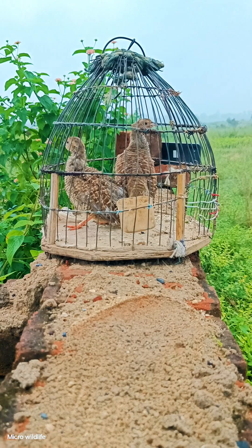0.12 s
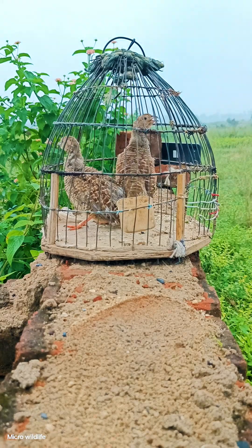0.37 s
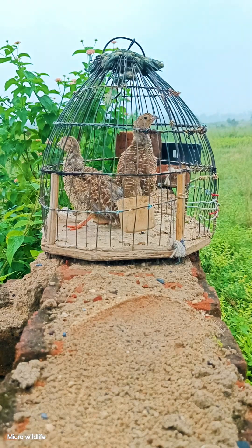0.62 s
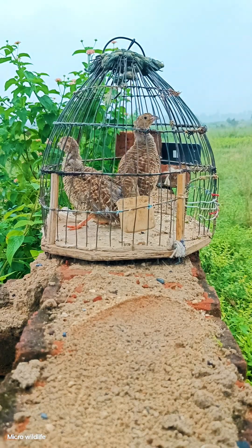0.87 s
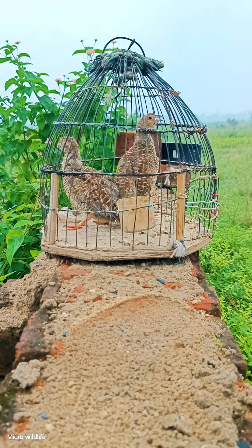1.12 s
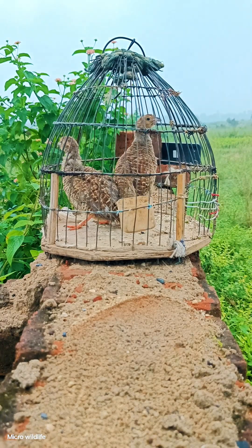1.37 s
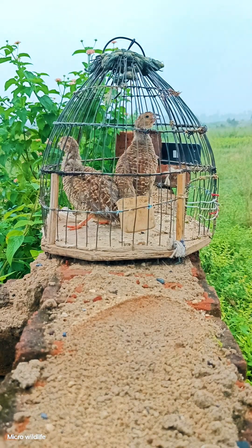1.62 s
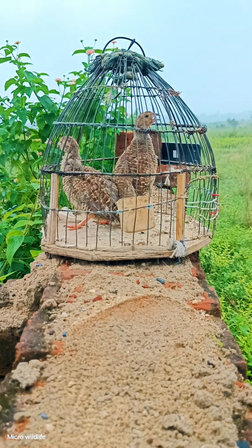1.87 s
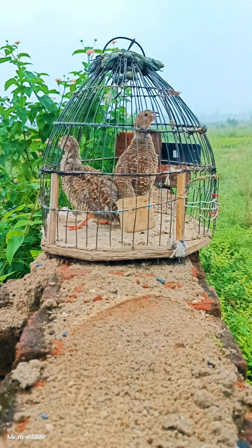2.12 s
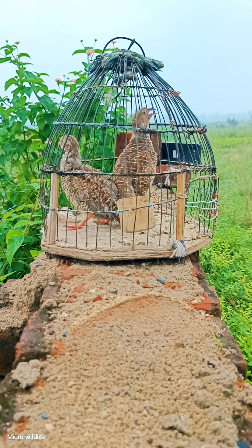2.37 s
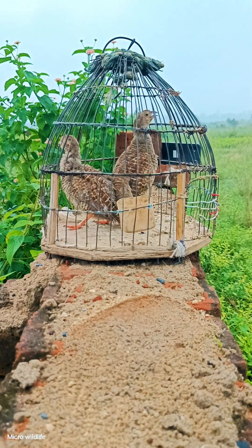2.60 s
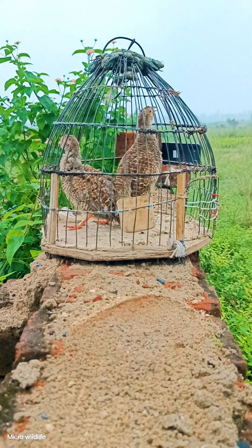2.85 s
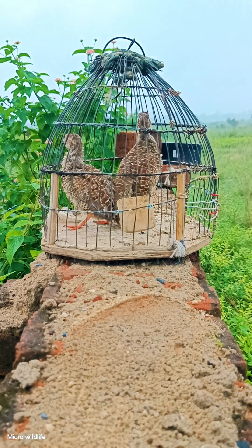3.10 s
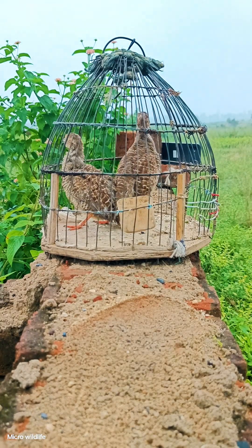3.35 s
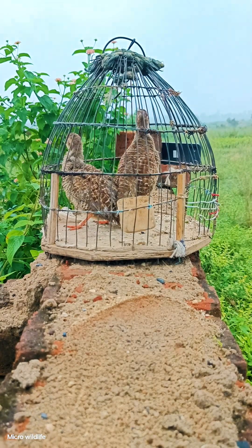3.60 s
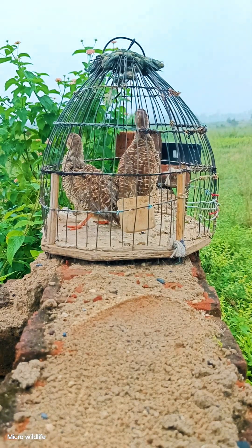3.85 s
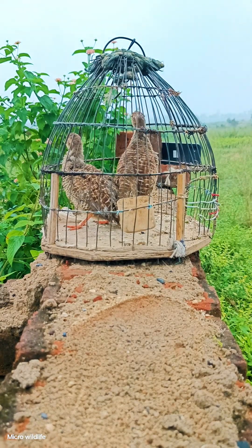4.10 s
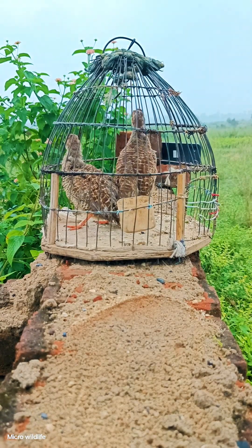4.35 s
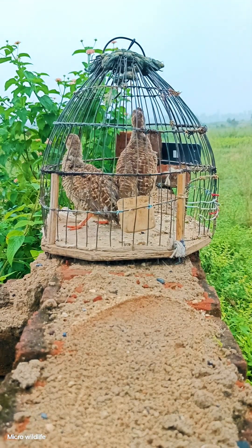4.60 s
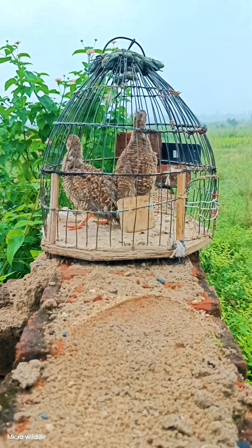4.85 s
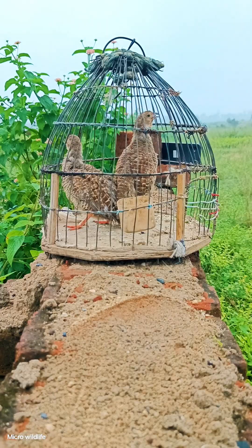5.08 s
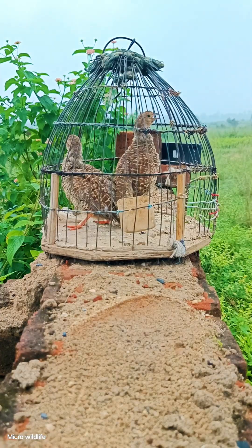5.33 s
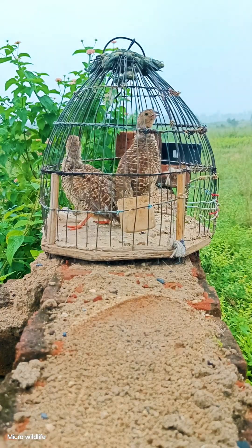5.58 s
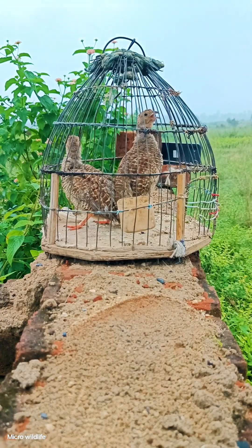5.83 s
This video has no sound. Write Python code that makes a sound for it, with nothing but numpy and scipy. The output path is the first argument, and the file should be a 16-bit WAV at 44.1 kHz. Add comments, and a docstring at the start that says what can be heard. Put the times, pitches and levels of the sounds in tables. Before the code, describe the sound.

Close, piercing two-note partridge-like calls, each rasping up into a short whistle, repeat briskly over a very quiet open field.

```python
"""Open farmland: a caged francolin calls close to a two-port microphone. Each note is a rising rasp that
locks into a whistle and breaks back into rasp, built from jittered harmonics and a near sine.
Hedges and walls throw back smeared echoes; throbbing noise bands make the insects, gliding whistles the
small far birds, shaped noise the rumble. A noise gate lowers the quiet between calls."""
import sys
import numpy as np
from scipy import signal
from scipy.fft import rfft, irfft
from scipy.io import wavfile
from scipy.ndimage import uniform_filter1d, minimum_filter1d

SR = 44100
rng = np.random.default_rng(int(sys.argv[2]) if len(sys.argv) > 2 else 0)


def makeup_ratio(level_db):
    """Linear amplitude ratio for a level in decibels (20 dB per factor of ten)."""
    decades = np.asarray(level_db, float) / 20
    return 10 ** decades


def file_out(sig):
    """Save sig as 16-bit WAV at sys.argv[1]."""
    # one column per channel
    cols = np.atleast_2d(sig).T
    # limit, then scale
    lim = np.clip(cols, -1, 1)
    pcm = np.round(lim * 32767).astype(np.int16)
    wavfile.write(sys.argv[1], SR, pcm)


N = 262832  # samples

# throat resonances with the beak open: (pitch_hz, level_db)
THROAT_COLOUR = [(250, -35.5), (500, -23), (1200, 1), (1800, 4), (2400, 2.5), (3000, -6), (4200, -19),
                 (5000, -18.5), (6500, -45), (7600, -18), (9500, -33), (13500, -42), (15500, -45.5)]


def read(points, hz):
    """Table lookup on a log-frequency axis."""
    f, value = np.transpose(points)
    return np.interp(np.log(hz + 1), np.log(f + 1), value)


def evened(x):
    """Scales to rms 1."""
    return x / np.sqrt(np.mean(x ** 2) + 1e-20)


def add(mix, s, sound):
    """Mixes a sound in at time s."""
    part = mix[round(s * SR):][:len(sound)]
    part += sound[:len(part)]


def wobble(size, width):
    """Smooth random wander, rms about 1: noise averaged twice over width samples."""
    noise = rng.standard_normal(4096 * 3)
    smooth = uniform_filter1d(uniform_filter1d(noise, int(width)), int(width))
    return evened(smooth)[:size]


def curves(rows):
    """Rows joined by straight lines at the sample rate; the first column is time in seconds."""
    s, *columns = np.transpose(rows)
    t = np.arange(s[0], s[-1], 1 / SR)
    return [np.interp(t, s, c) for c in columns]


def francolin():
    """Two-note calls; in the first two calls the second note stays a croak."""
    # short, high first notes: (start_s, whistle_locks_s, whistle_breaks_s, top_pitch_hz, level_db)
    first_notes = [(.448, .498, .530, 1946, -11), (1.131, 1.179, 1.216, 2022, -8.5),
                   (1.618, 1.665, 1.700, 2087, -8), (2.028, 2.070, 2.107, 2161, -7),
                   (2.404, 2.446, 2.482, 2160, -4.5), (2.776, 2.818, 2.855, 2177, -5.5),
                   (3.160, 3.201, 3.236, 2179, -6), (3.544, 3.585, 3.622, 2176, -8.5),
                   (3.930, 3.969, 4.003, 2165, -8), (4.301, 4.342, 4.379, 2169, -7.5),
                   (4.689, 4.732, 4.765, 2147, -6.5), (5.087, 5.132, 5.162, 2147, -8.5),
                   (5.482, 5.528, 5.561, 2155, -7.5), (5.917, 5.963, 5.996, 2135, -6.5)]
    # longer second notes arching down: (start_s, whistle_locks_s, whistle_breaks_s, top_pitch_hz, level_db)
    second_notes = [(1.727, 1.774, 1.824, 1826, -7), (2.133, 2.173, 2.220, 1909, -7),
                    (2.509, 2.544, 2.596, 1940, -4.5), (2.878, 2.919, 2.971, 1933, -6),
                    (3.264, 3.303, 3.351, 1944, -7), (3.645, 3.687, 3.738, 1924, -8.5),
                    (4.029, 4.069, 4.113, 1942, -7), (4.402, 4.440, 4.490, 1922, -7.5),
                    (4.791, 4.831, 4.875, 1889, -7), (5.186, 5.225, 5.272, 1922, -6.5),
                    (5.585, 5.627, 5.671, 1892, -5.5)]
    # one weak extra note: (start_s, whistle_locks_s, whistle_breaks_s, top_pitch_hz, level_db)
    weak_notes = [(3.803, 3.828, 3.873, 1981, -21.5)]
    # whistle shapes: (share of the whistle 0-1, pitch factor, level_db over the note level)
    first_shape = [(0, .962, -9), (.15, 1.0, -1.5), (.48, .975, 0), (.78, .955, 0), (1, .932, -1.5)]
    second_shape = [(0, .974, -3.5), (.18, 1.0, -.7), (.49, .978, -.5), (.8, .907, .5), (1, .851, -3)]
    weak_shape = [(0, .95, -3), (.25, 1.0, 0), (.55, .95, 0), (.8, .8, -2), (1, .66, -3)]
    # notes that never lock into a whistle, one list each: (time_s, pitch_hz, level_db)
    croaks = [
        [(.562, 557, -21), (.58, 816, -22), (.596, 1003, -13), (.61, 1109, -18), (.634, 933, -14),
         (.66, 818, -18.5), (.68, 873, -22.5), (.71, 662, -27), (.725, 568, -45.5)],
        [(1.247, 722, -24.5), (1.258, 779.6, -17.5), (1.278, 1106, -13.5), (1.301, 1236, -14.5),
         (1.335, 1053, -18), (1.36, 918, -15), (1.378, 800, -36)],
    ]
    # rasp round the whistle: (lead-in over whistle dB, depth of its swell 0-1,
    # tail over whistle dB, tail length s, roughness factor)
    first_rasp = (-6, .95, -13, .017, .85)
    second_rasp = (-5, .55, -13.5, .023, 1.15)
    weak_rasp = (0, .6, -8, .04, .6)
    # half-pitch share and roughness of each croak build up after its start
    croak_half, croak_rough, settle_s = .8, (.33, .6), .03

    out = np.zeros(N)
    for notes, shape, rasp_rule in [(first_notes, first_shape, first_rasp),
                                    (second_notes, second_shape, second_rasp),
                                    (weak_notes, weak_shape, weak_rasp)]:
        for row in notes:
            add(out, row[0], note(.2, row, shape, rasp_rule))
    for rows, rough in zip(croaks, croak_rough):
        start = rows[0][0]
        built = [min((s - start) / settle_s, 1) for s, hz, db in rows]
        croak = [(*r, croak_half * b, rough * b) for r, b in zip(rows, built)]
        add(out, start, rasp(croak, shut_db=7.5))
    no_bass = signal.butter(6, 430, "high", fs=SR, output="sos")  # a small body radiates no bass
    return signal.sosfilt(no_bass, out)


def note(out_s, row, shape, rasp_rule):
    """Lead-in rasp climbing an octave, whistle, then a short falling rasp near half the whistle pitch."""
    # lead-in rasp: (share of the lead-in 0-1, pitch factor, level_db before the swell depth,
    # half-pitch share, roughness before the note's roughness factor)
    lead_in = [(0, .5, -40, 0, .3), (.06, .56, -21, .05, .3), (.33, .77, -14, .25, .35),
               (.62, .9, -5, .7, .5), (.84, 1.02, 0, .7, .5), (.97, 1.05, -20, .7, .5)]
    # whistle overtones, before they breathe and the throat colours them: (multiple, level_db)
    overtones = [(.5, -26), (1.5, -21), (2, -23.5), (3, -28.5), (3.5, -30), (4, -21.5), (5, -28.5),
                 (6, -40.5), (7, -39.5), (8, -38)]
    lead_hz = 1253.5  # what the lead-in pitch factors multiply
    breath_db = -40  # air noise under the whistle

    start, on, off, top_hz, db = row
    lead_db, swell, tail_db, tail_s, harsh = rasp_rule
    rows = [(on + u * (off - on), f * top_hz, db + d) for u, f, d in shape]
    lead = [(start + u * (on - start), f * lead_hz, db + lead_db + swell * d, half, harsh * rough)
            for u, f, d, half, rough in lead_in]

    low_hz, end, tail_db = rows[-1][1] / 2, off + tail_s, db + tail_db
    drop = np.clip(1 - 22 * (tail_s - .019), .5, 1)  # a longer tail sinks further
    tail = [(off - .001, 1.1 * low_hz, tail_db - 16, .5, .6),
            (off + .004, .96 * low_hz, tail_db + 1, .5 * harsh, .5 * harsh),
            (end - .005, .92 * drop * low_hz, tail_db - 4, .4 * harsh, .4 * harsh),
            (end + .002, .9 * drop * low_hz, tail_db - 22, .3, .35)]

    out = np.zeros(round(out_s * SR))
    held = [(on - .003, *rows[0][1:]), *rows, (off + .004, *rows[-1][1:])]  # overlaps both rasps
    add(out, on - .003 - start, whistle(held, overtones))
    air = np.hanning(round((off - on + .02) * SR)) ** .5
    add(out, on - .01 - start, makeup_ratio(db + breath_db) * air * breath(len(air)))
    add(out, 0, rasp(lead, shut_db=-1.5))
    add(out, off - .001 - start, rasp(tail, shut_db=4))
    return out


def rasp(rows, shut_db):
    """Unsteady membranes: harmonics with every second cycle weaker, jitter, and shimmer."""
    open_hz, closing = 950, .45  # under this pitch the throat resonances sink with the pitch
    hz, db, half, rough = curves(rows)
    jitter = 1 + .075 * rough * wobble(len(hz), width=60)
    turns = np.cumsum(hz * jitter) / SR / 2  # cycles of the half pitch
    # dB per octave lost over 1.4 kHz; the beak closes as the pitch falls
    muffle_db = shut_db * (1200 / hz) ** 1.5
    sink = np.maximum(open_hz / hz, 1) ** closing
    tone = np.zeros(len(hz))
    for k in range(1, 50):
        share = half if k % 2 else 1  # odd k are the half-pitch lines
        fuzz = rough * np.minimum(.2 + .05 * k ** 2, 3)  # high partials blur most
        slow = 1.1 * fuzz * wobble(len(hz), width=60)
        fast = .3 * fuzz * wobble(len(hz), width=14)
        shimmer = (1 + slow + fast) / np.sqrt(1 + 1.5 * fuzz ** 2)
        octaves_over = np.clip(np.log2(k * hz / 2800), 0, 1.3)
        colour = makeup_ratio(read(THROAT_COLOUR, k * hz / 2 * sink) - muffle_db * octaves_over)
        colour = colour * (k * hz < 31000)  # no partials from 15.5 kHz up
        tone += share * shimmer * colour * np.cos(2 * np.pi * (k * turns + rng.random()))
    tone = tone / np.sqrt(uniform_filter1d(tone ** 2, 900) + 1e-9)
    return makeup_ratio(db) * tone * signal.windows.tukey(len(hz), min(1, 120 / len(hz)))


def whistle(rows, overtones=()):
    """A near sine; on the highest notes half-pitch lines creep in as the lock weakens."""
    hz, db = curves(rows)
    hz = uniform_filter1d(hz, len(hz) // 9, mode="nearest")
    db = uniform_filter1d(db, 100, mode="nearest")
    turns = np.cumsum(hz * (1 + 0.004 * wobble(len(hz), width=18))) / SR
    creep = np.linspace(0, .8, len(hz)) * makeup_ratio(np.clip(.12 * (hz.mean() - 2080), -30, 0))
    tone = np.sin(2 * np.pi * turns)
    for k, k_db in overtones:
        # each overtone breathes on its own
        breathing_db = np.minimum(k, 4.5) * wobble(len(hz), width=220) + 3 * rng.standard_normal()
        strain_db = -.4 * (db - 0.5)  # softer notes are less pure
        size = makeup_ratio(k_db + breathing_db + strain_db + .5 * read(THROAT_COLOUR, k * hz))
        size = size * (creep if k % 1 else 1)
        blur = .06 * k * wobble(len(hz), width=90)  # radians
        tone += size * np.sin(2 * np.pi * (k * turns + rng.random()) + blur)
    return np.sqrt(2) * makeup_ratio(db) * tone * signal.windows.tukey(len(hz), min(1, 300 / len(hz)))


def breath(size):
    """Bright air noise coloured by the throat."""
    edge_hz = 5500  # bright above this
    hz = np.fft.rfftfreq(size, 1 / SR)
    colour = makeup_ratio(.5 * read(THROAT_COLOUR, hz)) / (1 + (edge_hz / (hz + 1)) ** 6)
    return evened(irfft(rfft(rng.standard_normal(size)) * colour, size))


def ports(x):
    """One close source reaches the two ports with unlike level and phase."""
    # body shadow and ground bounce: (pitch_hz, left over right dB, left lead radians beyond the path gap)
    port_balance = [(86, -1.4, -3.08), (430, 2.8, -0.18), (775, 2.8, 0.01), (1119, 5.8, 0.37),
                    (1378, -1.0, -1.17), (1550, -6.0, -0.92), (1722, -8.0, 0.04), (1894, -4.9, 1.02),
                    (2067, 0.1, 1.44), (2239, 6.9, 1.46), (2411, 12.5, 4.06), (2670, 5.6, 4.87),
                    (3100, 2.6, 4.9), (3531, -7.1, 4.85), (3875, -9.9, 6.26), (4306, -5.1, 7.73),
                    (4823, 1.6, 7.46), (5512, 1.7, 6.72), (6201, -3.1, 6.79), (6718, -14.4, 5.7),
                    (7149, -21.1, 7.33), (7751, -8.0, 7.71), (8441, 4.9, 8.15), (9302, 13.0, 7.22),
                    (10077, 20.1, 7.86), (10680, 8.1, 8.17), (11369, 1.6, 9.7), (12230, 5.7, 7.07),
                    (13264, -7.1, 7.34), (14470, -15.6, 8.75), (15331, -12.2, 10.7)]
    port_gap = 12  # samples of plain path difference
    hz = np.fft.rfftfreq(2048, 1 / SR)
    f, tilt_db, lead = np.transpose(port_balance)
    tilt = makeup_ratio(np.interp(hz, f, tilt_db))
    lead = np.interp(hz, f, lead) + 2 * np.pi * hz * port_gap / SR
    pair = np.array([tilt * np.exp(1j * lead / 2), np.exp(-1j * lead / 2)])
    pair = pair * np.sqrt(2 / (1 + tilt ** 2))  # same summed power at every pitch
    taps = np.roll(irfft(pair), 1024, axis=1) * np.hanning(2048)
    return signal.oaconvolve(x[None], taps, axes=1)[:, 1024:N + 1024]


def head_turn():
    """The head turns and shifts the balance: opposite gains for left and right."""
    # (time_s, left over right dB)
    turn_points = [(.4, -3), (1.898, -2), (2.798, 0.5), (3.301, 1), (4.301, 2), (4.8, 0.5), (5.9, 0)]
    half_db = np.interp(np.arange(N) / SR, *np.transpose(turn_points)) / 2
    return makeup_ratio(np.array([half_db, -half_db]))


def echoes(x):
    """Smeared, dulled echoes off hedges and walls over a thin scattered tail."""
    # (delay_s, level_db before spreading over the smear, smear_s)
    hedge_echoes = [(0.075, -37.5, 0.056), (0.094, -53, 0.0043), (.2, -51.5, 0.02), (0.271, -51, 0.0067)]
    t = np.arange(SR // 2) / SR
    shape = makeup_ratio(-46.5 - 60 * t / 0.1) * (t > .004)  # the tail falls 60 dB in 0.1 s
    for delay, db, smear in hedge_echoes:
        shape = shape + makeup_ratio(db) / np.sqrt(smear * SR) * np.exp(-((t - delay) / smear) ** 2)
    taps = shape * rng.standard_normal((2, len(t)))
    dull = signal.lfilter(*signal.butter(4, 2600, fs=SR), x)
    return signal.fftconvolve(dull[None], taps, axes=1)[:, :N]


def zips():
    """A repeated buzzy zip: short bands of noise that swell and slide down in pitch."""
    # (end_s, level_db halfway through the swell)
    zip_times = [(.11, -54), (.415, -51), (1.065, -47), (1.411, -55), (1.92, -75), (2.311, -69),
                 (2.719, -56.5), (3.088, -52.5), (3.439, -53), (3.79, -49.5), (4.211, -54), (4.6, -67.5),
                 (5.042, -55.5), (5.429, -62), (5.769, -63)]
    zip_s, top_hz, fall_hz, width_hz, swell_db = .075, 8250, 650, 1000, 7
    out, u = np.zeros(N), np.arange(0, 1, 1 / (zip_s * SR))
    turns = np.cumsum(top_hz - fall_hz * u ** 3) / SR
    for end, db in zip_times:
        a, b = rng.standard_normal((2, len(u)))
        noise = signal.lfilter(*signal.butter(3, width_hz / 2, fs=SR), a + 1j * b)
        band = noise * np.exp(2j * np.pi * turns)  # moved up to the sliding pitch
        swell = makeup_ratio(db + swell_db * (u - 0.5))
        add(out, end - zip_s, swell * evened(band.real) * signal.windows.tukey(len(u), .15))
    return out


def trills():
    """Small bird trills: three falling whistled chips, each trill loudening 2 dB a chip."""
    # (start_s, start_pitch_hz, level_db of the first chip's peak)
    trill_starts = [(.07, 7250, -62), (.322, 6840, -52), (.915, 6760, -53), (1.578, 6800, -77),
                    (1.849, 6960, -66), (2.227, 6780, -54), (2.985, 7100, -53.5), (3.38, 6800, -68),
                    (4.089, 6960, -57), (4.85, 6780, -60.5), (4.969, 7130, -51.5), (5.38, 7160, -58.5)]
    out = np.zeros(N)
    for s, hz, db in trill_starts:
        for k in range(3):
            chip_db = db + 2 * k
            chip = [(0, hz, chip_db - 9), (.009, .945 * hz, chip_db), (.019, .885 * hz, chip_db - 7)]
            add(out, s + 0.031 * k, whistle(chip))
    return out


def far_songbirds():
    """Thin far songbird notes: pure whistles gliding from point to point."""
    # one list a note: (time_s, pitch_hz, level_db)
    song_notes = [
        [(.98, 3920, -68), (1.0, 3340, -57), (1.03, 3250, -56.5), (1.07, 3240, -58.5)],
        [(1.425, 3260, -69), (1.445, 3910, -68), (1.475, 3000, -66), (1.49, 3780, -62), (1.505, 3650, -59)],
        [(3.465, 4240, -60), (3.48, 4440, -54), (3.495, 4350, -77)],
        [(5.865, 4300, -71), (5.885, 4500, -67), (5.9, 4350, -64.5)],
        [(5.81, 3640, -73), (5.83, 3280, -72), (5.89, 3120, -71)],
    ]
    out = np.zeros(N)
    for rows in song_notes:
        add(out, rows[0][0], whistle(rows))
    return out


def near_insect():
    """One near insect: a 7.2 kHz tone wavering in phase, its strokes at 140 per second."""
    # (start_s, end_s, level_db)
    buzz_times = [(0.741, 0.896, -61.5), (1.262, 1.512, -50)]
    out = np.zeros(N)
    for start, end, db in buzz_times:
        t = np.arange(0, end - start, 1 / SR)
        strokes = 1 + 0.22 * np.sin(2 * np.pi * 140 * t) + 0.35 * wobble(len(t), width=96)
        tone = np.sin(2 * np.pi * 7200 * t + 2.1 * wobble(len(t), width=360))
        add(out, start, makeup_ratio(db) * strokes * tone * signal.windows.tukey(len(t), .1))
    return out


def insects():
    """Narrow buzzing choruses: noise round a carrier, throbbing with the wing strokes."""
    # (pitch_hz, width_hz, throbs per s, throb depth 0-1 before squaring)
    choruses = [(5050, 400, 45, .5), (7250, 500, 110, .4), (9900, 1300, 130, .3)]
    # level_db of each chorus
    chorus_db = [-69, -69, -68]
    t, out = np.arange(N) / SR, np.zeros(N)
    for (hz, width, rate, depth), db in zip(choruses, chorus_db):
        a, b, drift = rng.standard_normal((3, N))
        noise = signal.lfilter(*signal.butter(2, width / 2, fs=SR), a + 1j * b)
        band = noise * np.exp(2j * np.pi * hz * t)
        wander = 4 * evened(uniform_filter1d(drift, 3000))  # radians
        throb = (1 + depth * np.sin(2 * np.pi * rate * t + wander)) ** 2
        out += makeup_ratio(db) * evened(band.real * throb)
    return out


def coo():
    """A low hum: one gliding whistle tone."""
    # (time_s, pitch_hz, level_db)
    coo_curve = [(5.62, 160.2, -84), (5.638, 169, -41), (5.681, 148.3, -61)]
    out = np.zeros(N)
    add(out, coo_curve[0][0], whistle(coo_curve))
    return out


def drone():
    """A far hum that fades in midway: two low sines, wavering in phase."""
    # (pitch_hz, level_db before the fade-in)
    drone_lines = [(215, -66), (335, -67)]
    t = np.arange(N) / SR
    drift = evened(uniform_filter1d(rng.standard_normal((len(drone_lines), N)), 3000))
    lines = sum(makeup_ratio(db) * np.sin(2 * np.pi * hz * t + 0.84 * d) for (hz, db), d in zip(drone_lines, drift))
    return lines * np.clip((t - 1.8) / 4.4, 0, 1)


def field():
    """Air rumble, near alike at both ports in the bass, with unrelated hiss above."""
    # spectrum before levelling: (pitch_hz, relative dB per Hz)
    field_colour = [(30, -6), (100, -5), (200, -13.5), (400, -17.5), (1000, -26.5), (2500, -31),
                    (4000, -31.5), (7000, -33), (11000, -38.5), (15500, -58.5)]
    start_db = -62
    hz = np.fft.rfftfreq(N, 1 / SR)
    left, other = rfft(rng.standard_normal((2, N)))
    same = np.clip(0.78 / (1 + (hz / 330) ** 2), 0, 1)  # likeness of the two ports
    right = same * left + np.sqrt(1 - same ** 2) * other
    pair = np.array([left, right]) * makeup_ratio(read(field_colour, hz))
    t = np.arange(N) / SR
    rise_db = 2 * np.minimum(t / 8.4, 1)  # the breeze picks up
    return makeup_ratio(start_db + rise_db) * evened(irfft(pair, N))


def scene():
    """Bird, echoes and the field."""
    bird = francolin()
    close_bird = ports(bird) * head_turn()
    small_voices = ports(zips() + trills() + far_songbirds() + near_insect())
    chorus = np.array([ports(insects())[0], ports(insects())[1]])  # spread wide, unrelated at the two ports
    return close_bird + small_voices + chorus + echoes(bird) + field() + drone() + coo()


def low_pass(x):
    """Removes everything above the highest recorded frequency."""
    return signal.sosfilt(signal.butter(12, 15630, fs=SR, output="sos"), x)


def record(dry):
    """A gate keyed to the 1-3 kHz level turns quiet stretches down; loud peaks clip."""
    key = signal.lfilter(*signal.butter(2, [1000, 3000], "bandpass", fs=SR), dry)
    power_db = 10 * np.log10(abs(uniform_filter1d((key ** 2).mean(0), 600)) + 1e-12)
    held_db = -minimum_filter1d(-power_db, 1501, origin=700)  # holds each peak about 33 ms
    gate_db = -15 / (1 + np.exp((held_db + 57) / 4))  # half shut at -57 dB
    gated = dry * makeup_ratio(uniform_filter1d(gate_db, 400))
    return low_pass(np.clip(gated, -1, 1))


dry = scene()
out = record(dry)
file_out(out)
```